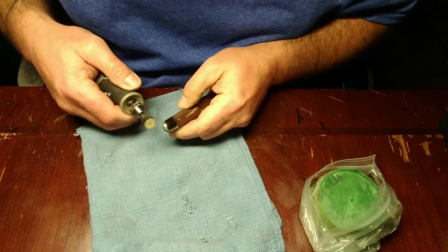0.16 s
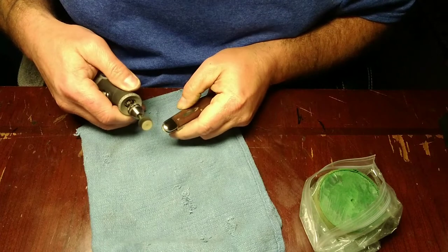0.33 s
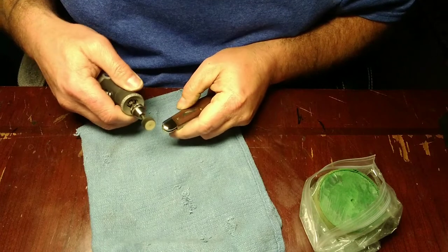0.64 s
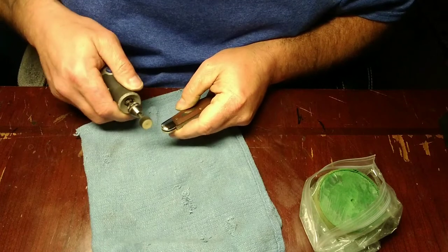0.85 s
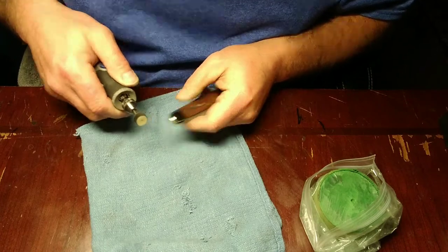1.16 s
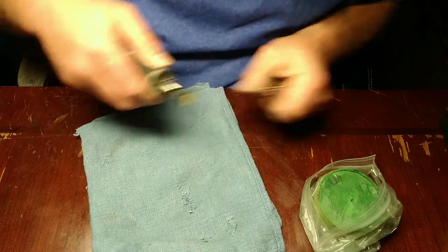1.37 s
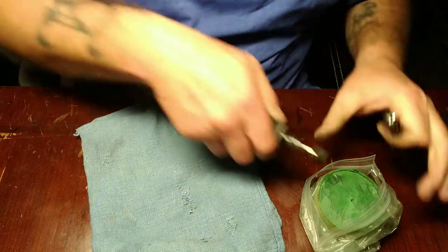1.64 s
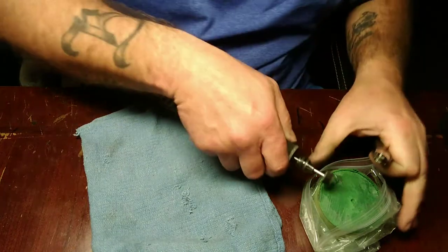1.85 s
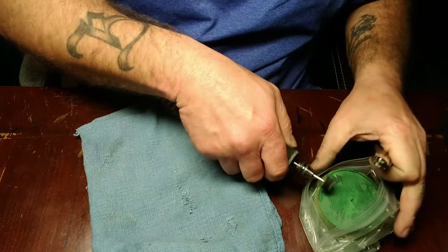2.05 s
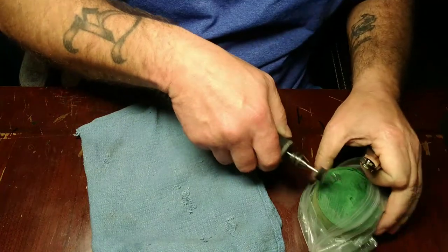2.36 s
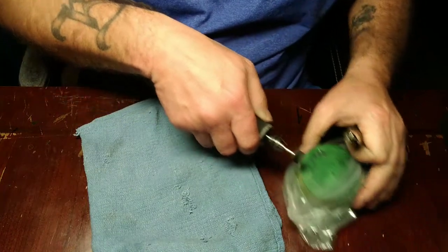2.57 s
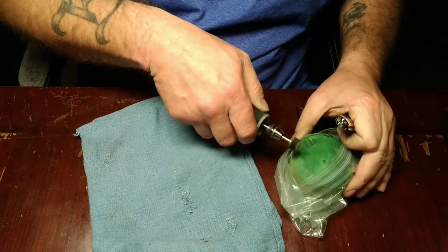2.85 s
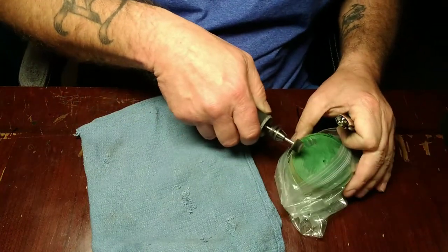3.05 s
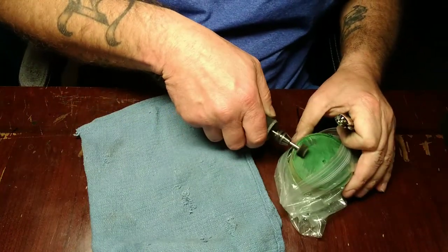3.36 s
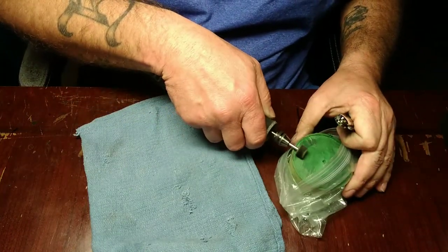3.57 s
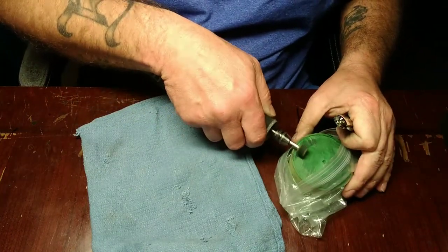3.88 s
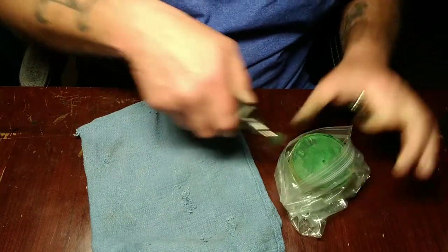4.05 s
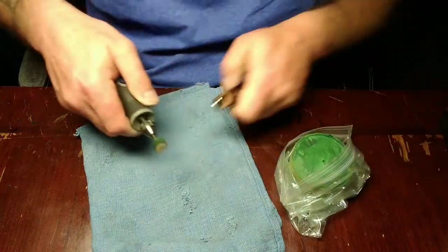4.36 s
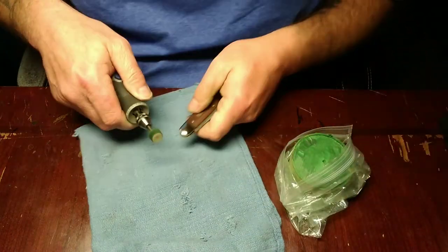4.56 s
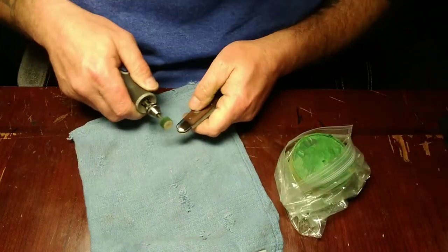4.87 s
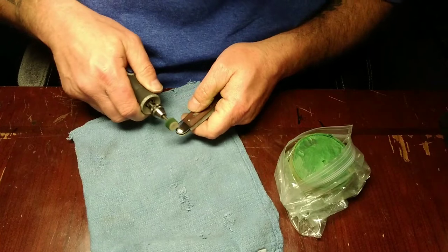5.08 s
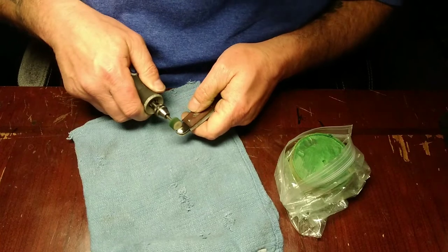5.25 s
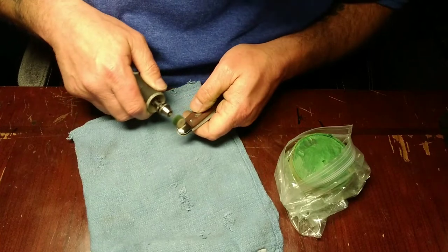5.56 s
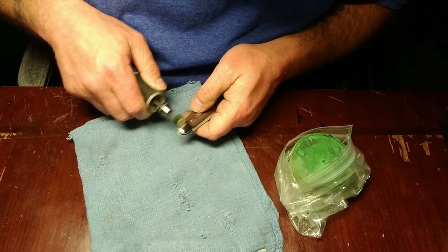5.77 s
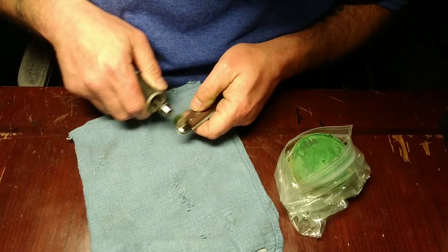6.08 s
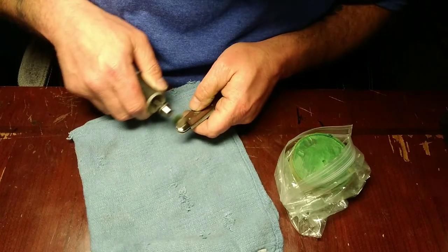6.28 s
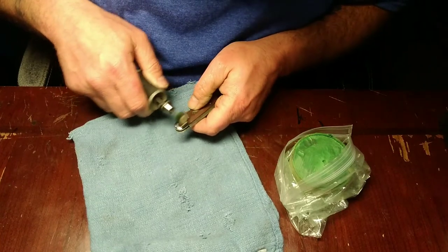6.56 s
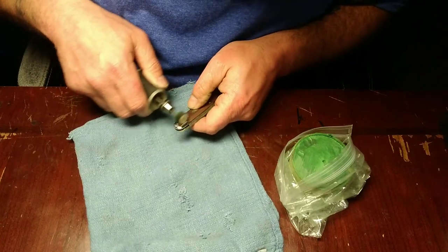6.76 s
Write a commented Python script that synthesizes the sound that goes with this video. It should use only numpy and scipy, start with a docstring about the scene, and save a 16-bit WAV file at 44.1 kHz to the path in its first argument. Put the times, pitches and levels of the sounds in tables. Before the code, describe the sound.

A handheld rotary tool whines and hisses at high speed, its pitch dipping as it pushes into compound, recovering, then sagging against metal.

```python
"""A rising whine and hiss, close to one microphone: a handheld rotary tool gains speed over a wooden table.
Its turning shaft sets the tones of the armature, the hissing siren and a roughness repeated each turn; chopped
mains current buzzes in the housing. The speed sags as the felt wheel is pushed into a tub of polishing
compound, which scrubs and shakes the table, recovers, and sags again as the wheel chatters on a metal piece.
A short workshop reverberation surrounds the motor; both channels carry the same sound."""
import sys
import numpy as np
from scipy import signal
from scipy.fft import rfft, irfft, next_fast_len
from scipy.io import wavfile
from scipy.ndimage import uniform_filter1d, map_coordinates

SR = 44100
rng = np.random.default_rng(int(sys.argv[2]) if len(sys.argv) > 2 else 0)


def transcribe(signal):
    """Save signal, clipped to [-1, 1], as a 16-bit WAV file at the path in sys.argv[1]."""
    frames = np.atleast_2d(signal).T
    limited = np.clip(frames, -1, 1)
    pcm = np.round(limited * 32767).astype(np.int16)
    wavfile.write(sys.argv[1], SR, pcm)


N = 305172
TIME = np.arange(N) / SR  # seconds
MAINS_HZ = 60
TOP_HZ = 15520  # upper limit of the microphone channel

# Leading armature tone, at 24 cycles a turn. Each row: time in seconds, level in dB.
LEAD_LEVEL = [(0, -56), (.2, -53), (.43, -52), (.76, -42.5), (1.25, -46.5), (1.5, -50), (3.38, -49.5),
              (3.52, -59), (3.92, -55), (4.06, -42), (4.44, -40.5), (4.9, -50.5), (5.46, -45),
              (5.68, -52.5), (5.95, -47), (6.1, -53.5), (6.55, -49), (6.74, -63)]
# Lesser armature tones. Each row: cycles per turn, depth of current pulsing (0-1), level running free in dB,
# dB per doubling of speed, dB more when turned to the tub, dB more when firm on the metal.
LESSER_TONES = [(12, 0, -66.5, -6, 3, -0.5), (16, 0.27, -57, 6, -4.5, -9), (32, 0.66, -58.5, 15, 0, 2.5),
                (40, 0.53, -62.5, 6, 3, -15), (56, 0, -51.5, 64, -0.5, -7)]
# Resonances where the lesser tones flare in passing. Each row: centre in Hz, width in Hz, gain in dB.
WHINE_FLARES = [(1650, 140, 7.5), (3750, 120, -1), (5100, 240, 10), (7565, 101, 9.5)]
# Weak low tones of the shaft. Each row: cycles per turn, level running free in dB,
# dB per doubling of speed, dB more when turned to the tub, dB more when firm on the metal.
LOW_TONES = [(8, -62, 38, 1.5, -0.033), (9, -68, 7, 7.5, -1.52)]
# Mains buzz. Each row: time in seconds, level in dB.
BUZZ_LEVEL = [(0, -47), (1.91, -44.5), (2.44, -45.5), (2.74, -50.5), (3.4, -47), (3.62, -51.5),
              (3.88, -44.5), (4.12, -51), (4.85, -44.5), (5.35, -46), (5.78, -50.5), (6.58, -51),
              (6.92, -45.5)]
# Resonances of the housing. Each row: centre in Hz, width in Hz, relative gain in dB.
HOUSING_MODES = [(1170, 160, -19), (2200, 260, -13), (2490, 150, 0)]

# Loudness of the rush with the tool's distance. Each row: time in seconds, change in dB.
NEARNESS = [(0, 2), (.07, -1), (.2, 0.5), (1.05, 0.8), (1.33, 1), (2.05, -0.1), (3.3, 1), (3.8, -0.5),
            (4.35, 0.5), (5, -0.1), (5.5, .6), (5.76, 0.15), (6.92, 0)]
# Spectra of cooling air, vent hiss and carbon brushes. Each row: frequency in Hz, relative density in dB per Hz.
AIR_SPECTRUM = [(30, -39), (80, -15), (200, -27), (300, -33), (400, -17), (520, -5.5), (1150, -3),
                (1800, -6), (2600, -0.5), (3800, 0.5), (4400, 2), (5600, 4.5), (6900, 3.5), (8000, 1.5),
                (10000, -6.5)]
VENT_SPECTRUM = [(6000, -25), (7200, -3.5), (8200, 7.5), (9000, 7), (10000, 2), (12000, -53)]
BRUSH_SPECTRUM = [(7000, -45.5), (8800, -8), (9700, -3.5), (10500, -0.5), (11500, 1), (12400, -1.5),
                  (13200, -1), (14400, -5.5), (15400, -5.5)]
# Level laws of air, vents, brushes and the sixth mains multiple. Each: level running free in dB,
# dB per doubling of speed, dB more when turned to the tub, dB more when firm on the metal.
AIR_LAW = (-38.5, 9, -1.4, -1.5)
VENT_LAW = (-37.5, 10, -4.5, 3.2)
BRUSH_LAW = (-28, 7.5, -1, -0.4)
HUM_LAW = (-89.5, -8, 16.5, 15)
# Narrow resonances of the shell around the siren. Each row: centre in Hz, width in Hz, gain in dB.
SHELL_MODES = [(3660, 82, -0.5), (4900, 98, 4.5), (9740, 89, 13), (11900, 150, 3.5)]

# Slight sags of speed with no sound of contact. Each row: start in seconds, length in seconds, drag in Hz.
LIGHT_SAGS = [(0.213, 0.48, 3.4), (0.928, 0.36, 3.36), (2.609, 1.704, .5), (4.303, 0.3, 3.6)]
# Pushes into the compound, summed where they overlap. Each row: start in seconds, length in seconds, drag in Hz.
COMPOUND_PUSHES = [(1.956, 0.14, 6.2), (3.416, 0.42, 24.2), (3.517, .349, 30.2)]
# A brief light push on the metal, then one long lean with shoves over it.
# Each row: start in seconds, length in seconds, drag in Hz.
METAL_PUSHES = [(5.151, 0.2, 4.9), (5.336, 1.63, 16.7), (5.604, .098, 14.8), (5.882, .444, 9.74),
                (6.541, 0.35, 15.4)]
# Spectra of scrubbing and of felt rasping. Each row: frequency in Hz, relative density in dB per Hz.
SCRUB_SPECTRUM = [(30, -14), (200, -6), (280, -5.5), (350, -15), (480, 0), (650, -0.5), (900, -14),
                  (2000, -35)]
FELT_SPECTRUM = [(300, -40), (550, 9.5), (1100, -3), (1900, 13.5), (4500, 3.5), (8000, -22)]

FREE_HZ, START_HZ = 135.21, 103.3  # turns a second: running free, and as the sound begins
SPIN_S, QUICK_S, QUICK_SHARE = 0.357, 0.087, 0.09  # slow and quick answer to load; share of the quick one
GRIP_S = 0.032  # a push builds up and lets go over this time
FIRM_HZ = 21.4  # drag, or lost speed, that counts as a firm push
SWING_S, RETURN_S, TURN_S = 1.62, 4.035, 0.13  # turns to the tub and back; time that one turn takes

LEAD_PULSING = 0.27  # depth to which the current pulses shake the leading tone
WAVER_DB, FLICKER_DB = 2.3, 1.8  # slow and quick wavering of the low tones and the sixth mains multiple
# siren in the air against its smooth noise; change when turned to the tub; change under a firm push into it
SIREN_DB, SIREN_TUB_DB, SIREN_PUSH_DB = -2.5, -4.5, 6

SCRUB_DB, SCRUB_GROWS, SCRUB_LAG_S = -57, 0.5, 0.015  # level at firm drag; power of drag; lag behind it
SHAKE_S, SHAKE_DB = 3.61, -39.5  # the tub bottoms out on the table; full level of the once-a-turn shake
SHAKE_ATTACK_S, SHAKE_HOLD_S, SHAKE_FALL_DB_PER_S = 0.035, 0.11, 125  # hold is counted from the start
CHATTER_DB, CHATTER_GROWS = -59, 1.87  # reference level when firm on the metal; power of the lost speed


def amp(db):
    """Decibels to gain."""
    return 10 ** (np.asarray(db) / 20)


def unit(x):
    """Scale to rms 1."""
    return x / np.sqrt(np.mean(x ** 2) + 1e-20)


def steady(x, size=3000):
    """Hold x at a running rms of 1, over size samples."""
    power = np.abs(uniform_filter1d(x ** 2, size=size))
    return x / np.sqrt(power + 1e-12)


def curve(rows):
    """Straight lines through (seconds, value) rows, one value per sample."""
    seconds, values = np.transpose(rows)
    return np.interp(TIME, seconds, values)


def wobble(rate):
    """A smooth random curve, rate knots a second."""
    coarse = np.arange(0, N + 64, 64)
    knots = rng.standard_normal(int(N * rate / SR) + 4)
    smooth = map_coordinates(knots, [coarse * rate / SR])
    return np.interp(np.arange(N), coarse, smooth)


def lag(x, seconds):
    """x followed with inertia."""
    keep = np.exp(-1 / (seconds * SR))
    return signal.lfilter([1 - keep], [1, -keep], x)


def filtered(x, response):
    """x times a complex response of frequency."""
    size = next_fast_len(N + SR // 4)
    hz = np.fft.rfftfreq(size, 1 / SR)
    return irfft(rfft(x, size) * response(hz), size)[:N]


def coloured(x, spectrum):
    """x filtered through (Hz, dB) points, at rms 1."""
    points_hz, points_db = np.transpose(spectrum)
    gain = lambda hz: amp(np.interp(np.log(hz + 1), np.log(points_hz), points_db))
    return unit(filtered(x, gain))


def bumps(resonances, hz):
    """Gain in dB of (Hz, width, dB) resonances at a frequency."""
    return sum(db / (1 + (2 * (hz - centre) / width) ** 2) for centre, width, db in resonances)


def tone(angle, order):
    """A sine of rms 1 at a multiple of the turning angle, in random phase."""
    return np.sqrt(2) * np.sin(order * angle + rng.uniform(0, 2 * np.pi))


def per_turn(angle, change, size=320, count=3):
    """A rough surface read once a turn: shaft multiples whose strengths drift, change knots a second."""
    place = angle / (2 * np.pi) % 1 * size
    surface = 0
    for _ in range(count):
        strength = wobble(change)
        surface = surface + strength * np.interp(place, np.arange(size), rng.standard_normal(size))
    return steady(surface)


def held(start, end, ramp):
    """1 from start to end, with straight ramps centred on both."""
    inside = np.minimum(TIME - start, end - TIME)
    return np.clip(inside / ramp + 0.5, 0, 1)


def drag(pushes):
    """The summed drag of pushes, in Hz."""
    return sum(hz * held(start, start + length, GRIP_S) for start, length, hz in pushes)


def slowing(pushes, behind_hz=0):
    """Speed lost by the shaft's inertial answer to drag, plus what it lacks at the start and makes up."""
    load = drag(pushes)
    follow = lambda seconds: lag(load, seconds) + behind_hz * np.exp(-TIME / seconds)
    return QUICK_SHARE * follow(QUICK_S) + (1 - QUICK_SHARE) * follow(SPIN_S)


def handling():
    """The hand loads and turns the tool: shaft speed in Hz, turn to the tub 0-1, firmness on metal 0-1."""
    lost_hz = slowing([*COMPOUND_PUSHES, *METAL_PUSHES, *LIGHT_SAGS], FREE_HZ - START_HZ)
    speed_hz = FREE_HZ - lost_hz + 0.1216 * wobble(30)
    at_tub = held(SWING_S, RETURN_S, TURN_S)
    on_metal = np.clip(slowing(METAL_PUSHES) / FIRM_HZ, 0, 1)
    return speed_hz, at_tub, on_metal


def level(law, hand):
    """Level in dB from the speed and from the way the tool is held."""
    free_db, speed_db, tub_db, metal_db = law
    speed_hz, at_tub, on_metal = hand
    return free_db + speed_db * np.log2(speed_hz / FREE_HZ) + tub_db * at_tub + metal_db * on_metal


def current(firing, rise, fall):
    """The speed control fires once each half wave of the mains; settings are shares of a half wave."""
    age = (2 * MAINS_HZ * TIME - firing) % 1
    return unit((1 - np.exp(-age / rise)) * np.exp(-age / fall) * (1 - age))


def whine(angle, hand, drive):
    """Armature tones, rough and pulsing with the current; the lesser ones flare in resonances."""
    speed_hz = hand[0]
    pulsed = lambda order, depth: tone(angle, order) * (1 + depth * (drive - drive.mean()))
    lead = amp(curve(LEAD_LEVEL) + 1.1 * wobble(19)) * pulsed(24, LEAD_PULSING)
    lesser = 0
    for order, depth, *law in LESSER_TONES:
        level_db = level(law, hand) + bumps(WHINE_FLARES, order * speed_hz) + 1.86 * wobble(14)
        lesser = lesser + amp(level_db) * pulsed(order, depth)
    return lead * (1 + 0.13 * wobble(250)) + lesser * (1 + 0.21 * wobble(120))


def overtones(angle, hand):
    """Weak low multiples of the shaft that wax and wane."""
    total = 0
    for order, *law in LOW_TONES:
        level_db = level(law, hand) + WAVER_DB * wobble(3.988) + FLICKER_DB * wobble(22)
        total = total + amp(level_db) * tone(angle, order)
    return total


def housing(hz):
    """Complex response of the housing: resonances with alternating signs."""
    total = 0
    for k, (centre, width, db) in enumerate(HOUSING_MODES):
        damping = 1j * hz * width
        total = total + (-1) ** k * amp(db) * damping / (centre ** 2 - hz ** 2 + damping)
    return total


def buzz(angle, drive):
    """Each current pulse tugs at the passing armature slots and rings the housing."""
    slots = amp(-8) * tone(angle, 8) + tone(angle, 16) + amp(-14) * tone(angle, 24)
    force = drive * (slots * (1 + 0.25 * wobble(120)) + amp(-8) * rng.standard_normal(N))
    ringing = steady(filtered(force, housing), size=8000)
    return amp(curve(BUZZ_LEVEL) + 0.64 * wobble(12)) * ringing


def siren(angle):
    """Eddies shed by the slots: flickering tones in fuzzy bands glide with the shaft through the shell."""
    bands = 0
    for order in range(32, 121, 8):
        core = amp(3.5 * wobble(11)) * (1 + 0.5 * wobble(70)) * tone(angle, order)
        fuzz = wobble(380) * tone(angle, order) + wobble(380) * tone(angle, order)
        bands = bands + core + fuzz
    return unit(filtered(bands, lambda hz: amp(bumps(SHELL_MODES, hz))))


def scraping(angle, sing, repeat):
    """Raw noise of the motor: turbulence, the siren, and a part that repeats with every turn."""
    bars = 1 + 0.14 * tone(angle, 8) + 0.077 * tone(angle, 16)  # swells as each commutator bar passes
    noise = bars * (rng.standard_normal(N) + repeat * per_turn(angle, change=5))
    return (noise + sing * siren(angle)) / np.sqrt(1 + sing ** 2)


def rush(angle, hand):
    """Cooling air, its hiss in the vents and the carbon brushes; the siren is plainest in the air."""
    at_tub = hand[1]
    near_db = curve(NEARNESS)
    air_db, vent_db, brush_db = (near_db + level(law, hand) for law in (AIR_LAW, VENT_LAW, BRUSH_LAW))
    pushed = np.clip(lag(drag(COMPOUND_PUSHES), QUICK_S) / FIRM_HZ, 0, 1)
    sing = amp(SIREN_DB + SIREN_TUB_DB * at_tub + SIREN_PUSH_DB * pushed)
    air = coloured(scraping(angle, sing, repeat=0.36), AIR_SPECTRUM)
    vent = coloured(scraping(angle, sing / 2, repeat=0.63), VENT_SPECTRUM)
    brush = coloured(scraping(angle, amp(-6.0) * sing, repeat=0.43), BRUSH_SPECTRUM)
    air = amp(air_db + 0.23 * wobble(19)) * air
    vent = amp(vent_db + 1.1 * wobble(16)) * vent
    brush = amp(brush_db + 0.4 * wobble(30)) * brush
    return air + vent + brush


def hum(hand):
    """The motor's iron hums at even mains multiples; the sixth depends on speed and how the tool is held."""
    mains = 2 * np.pi * MAINS_HZ * TIME
    second = amp(-66.5) * tone(mains, 2)
    fourth = amp(-87 + 3.2 * wobble(6.4)) * tone(mains, 4)
    sixth_db = level(HUM_LAW, hand) + WAVER_DB * wobble(10) + FLICKER_DB * wobble(24)
    return second + fourth + amp(sixth_db) * tone(mains, 6)


def room(x, t60, wet_db):
    """A short diffuse answer from the workshop: decaying noise that falls 60 dB in t60 seconds."""
    t = np.arange(SR // 3) / SR
    tail = rng.standard_normal(len(t)) * amp(-60 * t / t60) * (t > 0.003)
    return x + amp(wet_db) * signal.fftconvolve(x, tail / np.linalg.norm(tail))[:N]


def scrub(angle, drive):
    """The lopsided wheel strikes the compound with every turn, amid noise that follows the drag."""
    push = np.abs(lag(drag(COMPOUND_PUSHES), SCRUB_LAG_S) / FIRM_HZ)
    strikes = unit(sum(amp(5 * wobble(12)) * tone(angle, order) for order in range(2, 8)))
    rubbing = strikes * (1 + 0.4 * drive) + 2.6 * rng.standard_normal(N)
    return amp(SCRUB_DB) * push ** SCRUB_GROWS * coloured(rubbing, SCRUB_SPECTRUM)


def table_shake(angle):
    """Shaft shake beats against the pulsing torque, both passing through the tub into the table."""
    age = TIME - SHAKE_S
    fall_db = SHAKE_FALL_DB_PER_S * np.maximum(age - SHAKE_HOLD_S, 0)
    envelope = np.clip(age / SHAKE_ATTACK_S, 0, 1) * amp(SHAKE_DB - fall_db)
    torque = tone(2 * np.pi * MAINS_HZ * TIME, 2)
    return envelope * (tone(angle, 1) + 0.55 * torque)


def chatter(angle, hand):
    """The wheel knocks on the metal at multiples of the shaft, and its felt rasps once a turn."""
    on_metal = hand[2]
    envelope = amp(CHATTER_DB + 0.78 * wobble(14)) * on_metal ** CHATTER_GROWS
    knocks = sum(amp(db) * tone(angle, order) for order, db in ((7, -0.5), (1, -10.5), (3, -17), (10, -3)))
    rasp = amp(8.5) * coloured(per_turn(angle, change=4), FELT_SPECTRUM)
    return envelope * (knocks + rasp)


def scene():
    """One shaft drives the tool's tones and rush while the hand loads and turns it."""
    hand = handling()
    angle = 2 * np.pi * np.cumsum(hand[0]) / SR
    drive = current(firing=0.393, rise=0.052, fall=0.18)
    whining = room(whine(angle, hand, drive), t60=0.2, wet_db=-11)
    motor = overtones(angle, hand) + buzz(angle, drive) + rush(angle, hand)
    motor = room(motor, t60=0.21, wet_db=-5.0)
    wheel = scrub(angle, drive) + table_shake(angle) + chatter(angle, hand)
    return np.tile(whining + motor + hum(hand) + wheel, (2, 1))


def record(dry):
    """The microphone channel keeps nothing above its band limit."""
    return np.array([filtered(channel, lambda hz: hz < TOP_HZ) for channel in dry])


dry = scene()
out = record(dry)
transcribe(out)
```